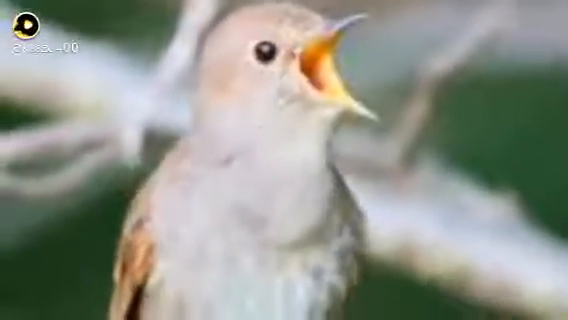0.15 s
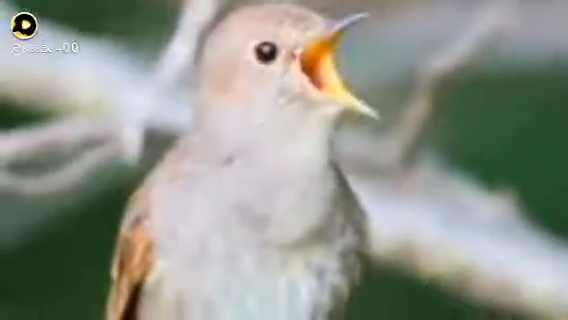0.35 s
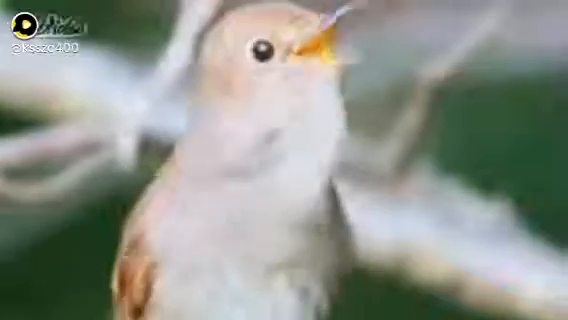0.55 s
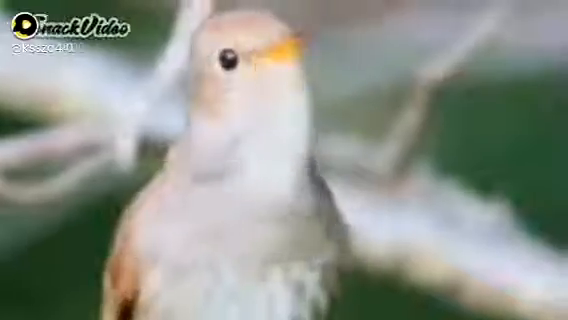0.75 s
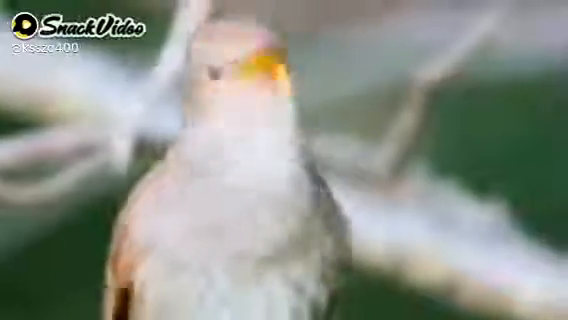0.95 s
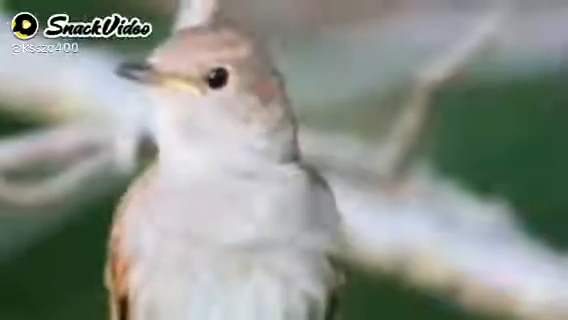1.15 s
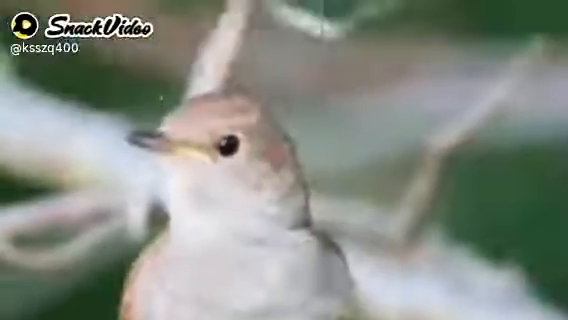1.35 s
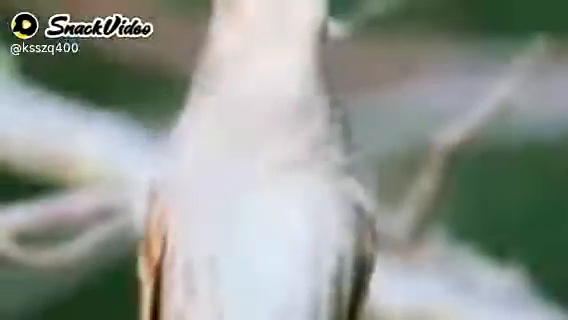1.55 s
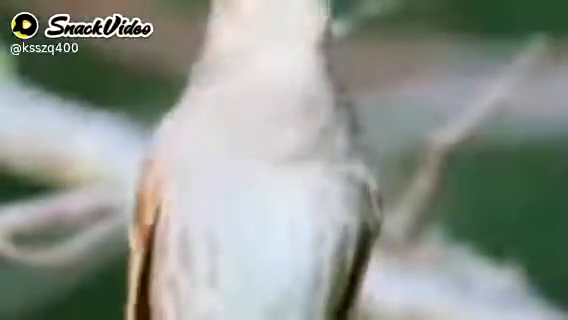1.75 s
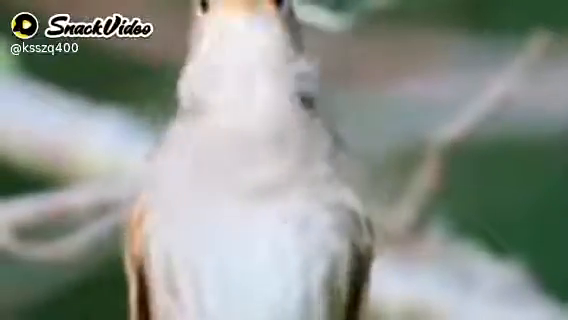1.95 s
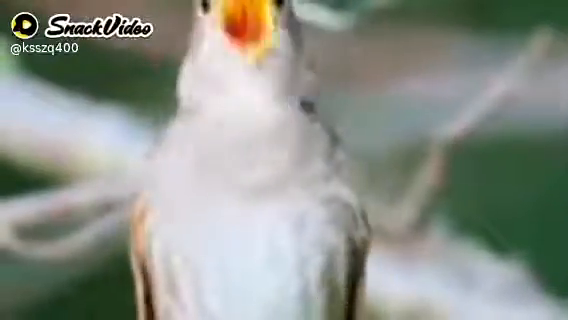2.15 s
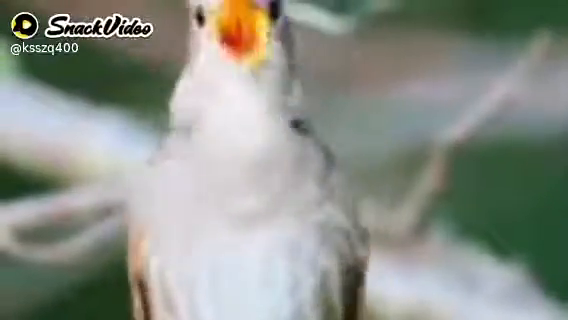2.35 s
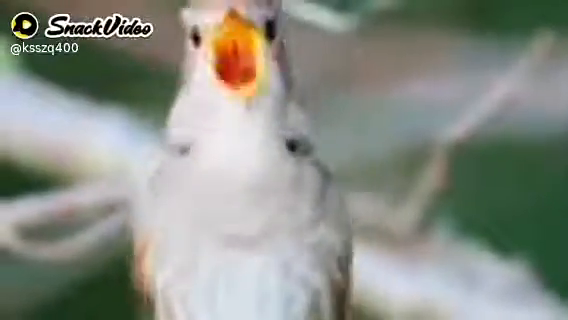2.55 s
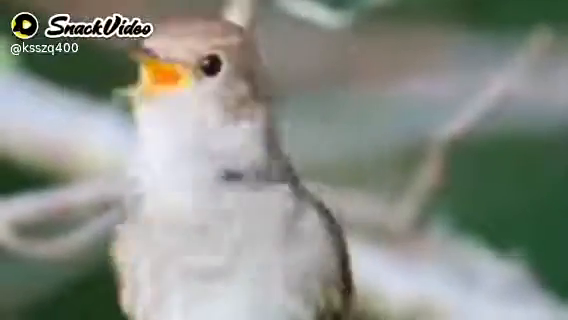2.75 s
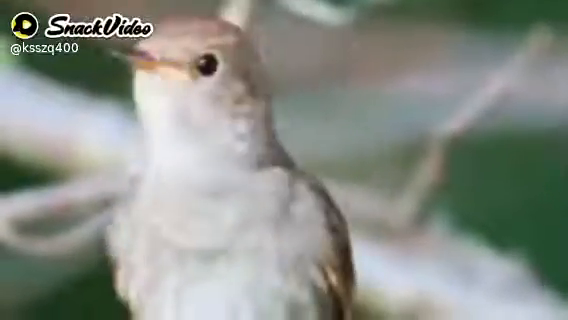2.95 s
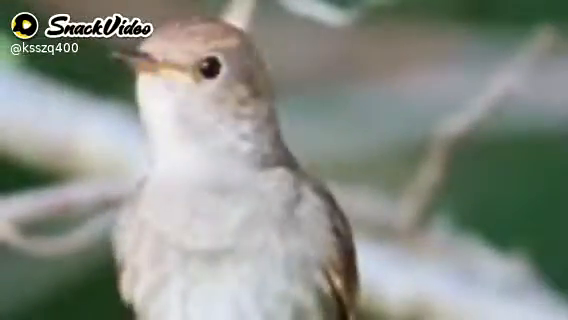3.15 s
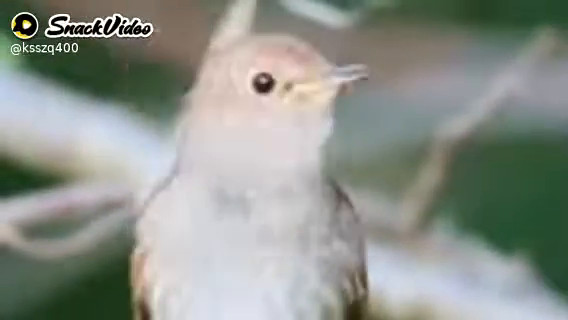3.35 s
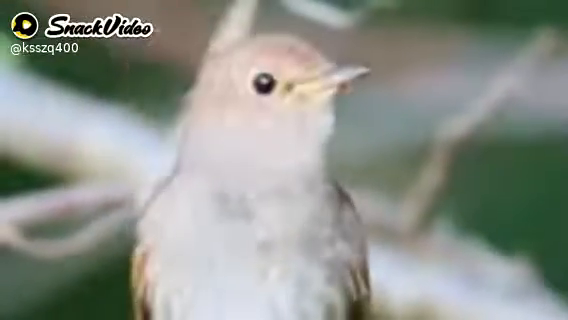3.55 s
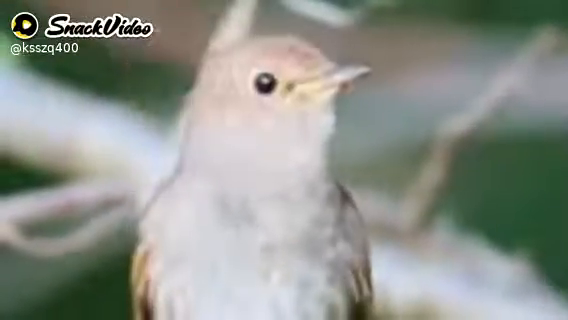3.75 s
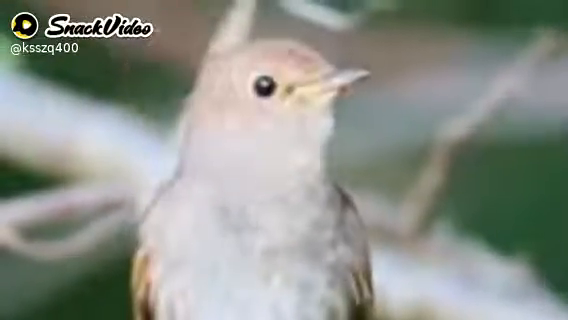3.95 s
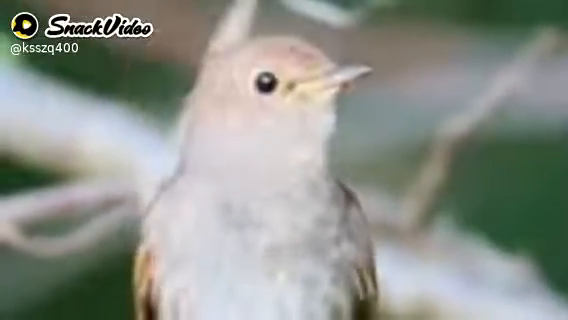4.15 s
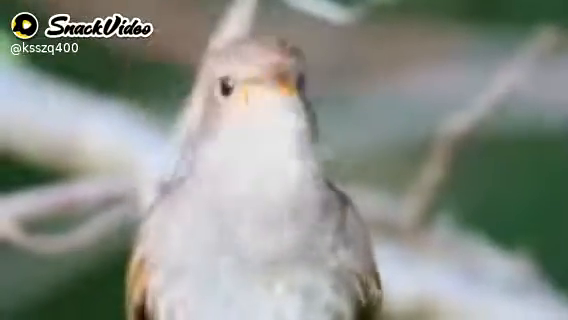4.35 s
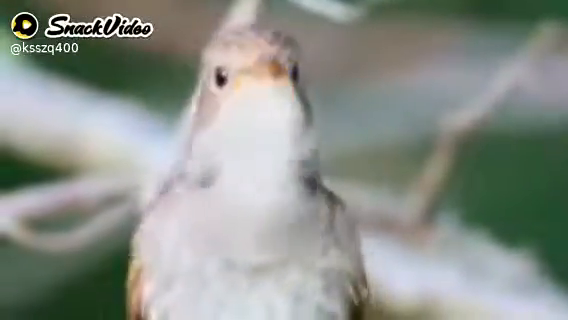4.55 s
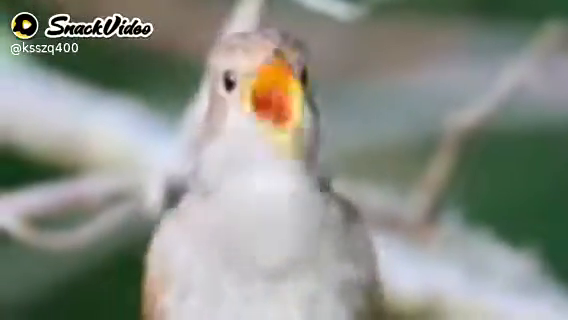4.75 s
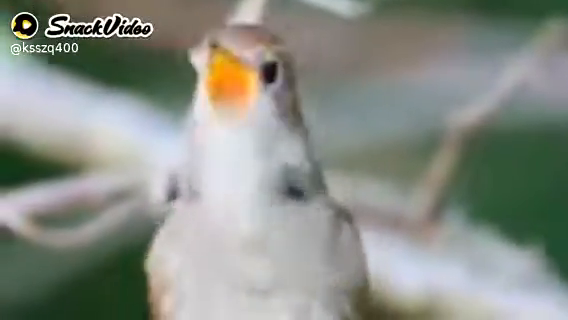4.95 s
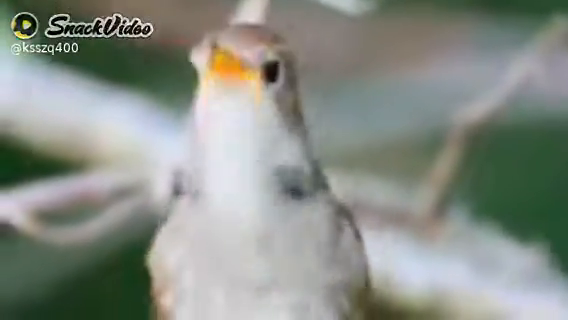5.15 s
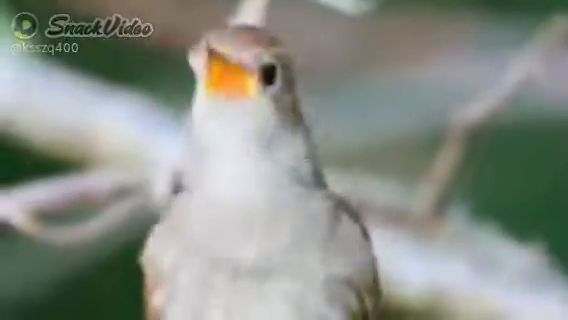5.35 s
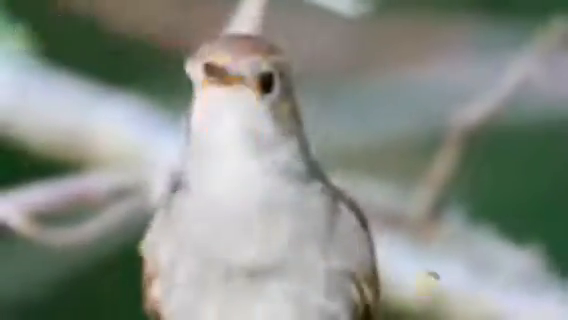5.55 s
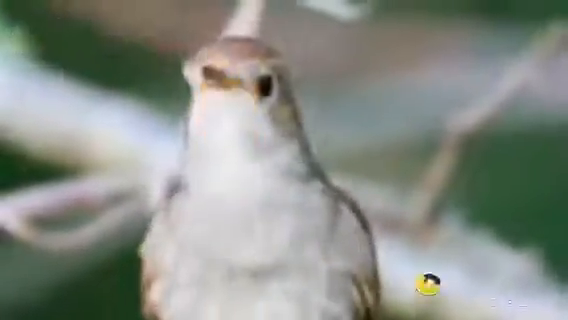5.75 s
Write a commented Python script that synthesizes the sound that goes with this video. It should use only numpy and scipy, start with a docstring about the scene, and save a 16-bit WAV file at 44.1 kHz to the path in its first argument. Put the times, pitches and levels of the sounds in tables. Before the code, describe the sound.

Close birdsong in a wood: dry rattle, quick slurred phrases, ringing pauses, fainter distant whistles and rasps, and a final clicking run ending in a buzz.

```python
"""A nightingale sings close by in a wood: a dry rattle of chaotic bursts, then three runs of fast swept notes.
The runs alternate slurs with low arches, scoops with chips, clicks with low arches; the last two end in a buzz.
Each note is a nearly pure tone with weak overtones and air hiss, shaped by the beak.
A second bird whistles and rasps farther off, mostly in the pauses and on into the third run.
Trunks and leaves scatter every note as decaying noise, over a soft outdoor hush and a faint low throb."""
import sys
import numpy as np
from scipy import signal
from scipy.fft import rfft, irfft, next_fast_len
from scipy.io import wavfile
from scipy.ndimage import map_coordinates

SR = 44100
rng = np.random.default_rng(int(sys.argv[2]) if len(sys.argv) > 2 else 0)


def store_pcm(level_fs):
    """Save levels as 16-bit WAV."""
    pcm = np.round(np.clip(level_fs, -1, 1) * 32767).astype(np.int16)
    wavfile.write(sys.argv[1], SR, np.atleast_2d(pcm).T)


N = 256662


def amp(db):
    """Decibels to gain."""
    return 10 ** (np.asarray(db) / 20)


def unit(x):
    """Scale to rms 1."""
    return x / np.sqrt(np.mean(x ** 2) + 1e-20)


def along(points, hz):
    """Read (f/Hz, value) points on a log frequency axis."""
    f, value = np.transpose(points)
    return np.interp(np.log(hz + 1), np.log(f + 1), value)


def curve(rows):
    """One value per sample from (t/s, value) rows."""
    return np.interp(np.arange(N) / SR, *np.transpose(rows))


def filtered(x, response):
    """Multiply the spectrum by a response of frequency."""
    size = next_fast_len(N + SR // 2)
    spectrum = rfft(x, size)
    return irfft(spectrum * response(np.fft.rfftfreq(size, 1 / SR)), size)[..., :N]


def noise(colour):
    """Coloured noise of rms 1."""
    white = rng.standard_normal(N)
    return unit(filtered(white, lambda hz: amp(along(colour, hz))))


def wobble(rate):
    """A smooth random curve, rate knots a second."""
    knots = rng.standard_normal(N // 8)
    return map_coordinates(knots, [np.arange(N) * rate / SR], mode="wrap")


def span(s, length):
    """The samples of a note and its progress u from 0 to 1."""
    i = np.arange(max(int(s * SR), 0), min(int((s + length) * SR), N))
    return i, np.clip((i / SR - s) / length, 0, 1)


def swell(u, peak, steepness):
    """Air pressure rises to its peak and falls again."""
    pressure = np.interp(u, [0, np.clip(peak, .05, .95), 1], [0, 1, 0])
    return np.sin(np.pi / 2 * pressure) ** steepness


def glide(u, pitches):
    """A smooth sweep through evenly spaced pitches: a polynomial in log pitch."""
    places = np.linspace(0, 1, len(pitches))
    fit = np.polyfit(places, np.log(pitches), len(pitches) - 1)
    return np.exp(np.polyval(fit, u))


# outdoor hush, relative spectrum: f/Hz, level/dB
HUSH_COLOUR = [(15, -33), (25, -16), (50, -5.5), (85, -7.5), (150, -8), (250, -5), (500, -1.5), (800, -4),
               (1280, -0.5), (1750, 3), (3000, -3), (5200, -14), (9500, -18.5), (14500, -37)]
# its rise and fall, before the lift in hush(): t/s, level/dB
HUSH_FADER = [(0.0, -54.5), (0.99, -58.5), (1.73, -57), (2.54, -59.5), (3.21, -57.5), (5.46, -55.5),
              (5.82, -56.5)]


def hush(lift_db=8.5):
    """Distant air and foliage: coloured noise whose level drifts slightly."""
    level_db = curve(HUSH_FADER) + lift_db + 0.14 * wobble(7.2)
    return amp(level_db) * noise(HUSH_COLOUR)


# strokes of the rattle: t/s, level/dB of the main burst, level/dB of the second burst re the main one
RATTLE_STROKES = [(.0095, -21.5, -6), (0.0491, -18.5, -4.5), (0.0887, -21.5, -11), (0.1214, -17.5, -10.5),
                  (0.167, -20, -21), (0.1933, -24, 5.5), (0.241, -22.5, -5), (0.2716, -23, 2.5),
                  (0.316, -21, -16), (0.352, -20.5, -4), (0.3923, -21.5, 1)]
# lone rasps, some on a note and some between notes: t/s, length/s, level/dB
SINGLE_RASPS = [(.903, 0.0091, -24), (1.718, .011, -45), (1.8315, 0.0075, -33.5), (1.8458, 0.0043, -36.5),
                (2.819, 0.0093, -36.5), (5.294, 0.017, -36), (5.457, 0.0043, -24.5)]
BURST_S, BURST_GAP_S, LEAD_IN_DB = 0.006, 0.0104, -9.5  # lead-in level is re the main burst


def bursts():
    """Each stroke is a weak lead-in, a main burst and a second one; lone rasps follow: (start, length, level)."""
    for s, db, second_db in RATTLE_STROKES:
        yield s - BURST_GAP_S, BURST_S, db + LEAD_IN_DB
        yield s, BURST_S, db
        yield s + BURST_GAP_S, BURST_S, db + second_db
    yield from SINGLE_RASPS


# relative spectrum of the rattle, shared by the tearing in song(): f/Hz, level/dB
RASP_SPECTRUM = [(710, -28), (1200, -25), (1800, -33), (1990, -25), (2570, -23.5), (2830, -8.5), (3260, -4),
                 (4640, 4), (6070, 0.5), (6610, 5.5), (8200, -11.5), (10800, -11), (11900, -8.5),
                 (14000, -22.5), (15600, -35)]


def rattle(likeness=0.037):
    """Short bursts of chaotic vibration; a small share of each repeats the same figure."""
    out, figure, fresh = np.zeros(N), noise(RASP_SPECTRUM), noise(RASP_SPECTRUM)
    for s, length, db in bursts():
        i, u = span(s, length)
        # power shares, so the mix keeps its level
        chaos = np.sqrt(likeness) * figure[:len(i)] + np.sqrt(1 - likeness) * fresh[i]
        out[i] += amp(db) * swell(u, 0.33, steepness=0.7) * chaos
    return out


# a faint low throb far off: t/s of the first beat's middle, period/s, number of beats
THROB_BEATS = (.082, .224, 9)


def throb(beat_hz=92, length=0.0576, db=-60):
    """Dull, evenly spaced beats of a low sine, their levels varying a little at random."""
    out, (first, period, beats) = np.zeros(N), THROB_BEATS
    for s in first + period * np.arange(beats):
        i, u = span(s, length)
        level = amp(db + rng.normal(0, 1.8))
        out[i] += level * np.sin(np.pi * u) ** 2 * np.sin(2 * np.pi * beat_hz * length * u)
    return np.roll(out, -int(length * SR / 2))  # centre each beat on its time


# low notes, each part of one arch, loudest near its crest:
# t/s, length/s, level/dB at the peak, place of the crest 0-1, f/Hz at the crest
LOW_ARCHES = [(0.4327, .021, -27.5, 0.2, 1840), (0.514, 0.032, -19.5, 1, 1980),
              (.6088, 0.039, -17, 0.74, 1950), (0.7118, 0.025, -13, 0.47, 1937),
              (0.806, 0.02, -23, 0.27, 1710), (4.5131, 0.02, -19, 0.12, 2207),
              (4.5648, 0.034, -14, 0.71, 2240), (4.6384, 0.022, -16.5, 0.15, 2180),
              (4.6893, 0.031, -11, 0.57, 2222), (4.755, 0.025, -24.5, 0.21, 1943),
              (4.812, 0.034, -14.5, 0.58, 2240), (4.8657, 0.034, -12.5, 0.67, 2209),
              (4.937, .023, -13.5, .22, 2200), (4.99, .03, -12, .62, 2188), (5.0642, 0.02, -16, 0.11, 2184),
              (5.1128, 0.03, -11, 0.49, 2187), (5.181, 0.021, -17.5, 0.95, 2180),
              (5.2402, .03, -11, 0.56, 2184), (5.291, 0.038, -16.5, 0.74, 2178),
              (5.3636, 0.025, -12.5, 0.29, 2165)]
# the shared arch: t/s from the crest, pitch as a share of the crest's
ARCH_SHAPE = [(-.027, .87), (-.018, .805), (-.01, .87), (-.003, 1), (.002, .99), (.007, .84), (.013, 0.57),
              (.021, 0.28)]


def arches():
    """Low notes that each sing a part of one shared pitch arch."""
    for s, length, db, crest, crest_hz in LOW_ARCHES:
        t = (span(s, length)[1] - crest) * length
        pitch = crest_hz * np.interp(t, *np.transpose(ARCH_SHAPE))
        yield s, length, db, np.clip(crest, .25, .68), pitch


# slurs: t/s, length/s, level/dB at the peak, place of the peak 0-1, place of the steepest fall 0-1, steepness
DOWN_SLURS = [(0.4729, 0.037, -12.5, 0.12, 0.36, 6.2), (.562, 0.04, -10, 0.36, 0.38, 6.7),
              (0.66, 0.034, -10.5, 0.41, 0.2, 8.8), (0.7576, 0.035, -12.5, 0.09, 0.23, 15),
              (0.848, 0.032, -10.5, 0, 0.36, 6.2), (2.1921, 0.035, -14, 0.48, 0.46, 3.6)]
SLUR_HIGH_HZ, SLUR_LOW_HZ = 3708, 2245  # the slide runs between these limits


def slurs():
    """Notes that slide down an S-curve from an upper pitch towards a lower one."""
    for s, length, db, peak, steepest, steepness in DOWN_SLURS:
        u = span(s, length)[1]
        still_high = 1 / (1 + np.exp(steepness * (u - steepest)))
        yield s, length, db, peak, SLUR_LOW_HZ + (SLUR_HIGH_HZ - SLUR_LOW_HZ) * still_high


# high whistles that open or close a run:
# t/s, length/s, level/dB at the peak, place of the peak 0-1, start f/Hz, end f/Hz
RUN_WHISTLES = [(0.9074, 0.037, -12.5, 0.45, 4350, 4690), (2.0645, 0.032, -14.5, 0.6, 6000, 5420),
                (2.087, 0.035, -11, 0.37, 5240, 4830), (2.809, 0.025, -12.5, 0.55, 6150, 4830)]


def whistles():
    """High notes that glide evenly in log pitch."""
    for s, length, db, peak, *pitches in RUN_WHISTLES:
        yield s, length, db, peak, glide(span(s, length)[1], pitches)


# scoops: t/s, length/s, level/dB at the peak, place of the peak 0-1, place of the lowest pitch 0-1
UP_SCOOPS = [(2.2456, 0.041, -13, 0.64, 0.2), (2.339, .045, -10, 0.32, 0.38),
             (2.4328, 0.039, -9.5, 0.45, 0.19), (2.525, 0.04, -10.5, 0.52, 0.2),
             (2.6115, .044, -11, 0.51, 0.43), (2.713, 0.0385, -9, 0.22, .28)]
SCOOP_HZ, SCOOP_TOP_HZ = 3068, 4250  # lowest pitch; ceiling of the curl
SCOOP_CURL_S = 0.042  # sets the curl: uncapped, an octave up this long after the lowest pitch


def scoops():
    """Notes that sag to one pitch and curl up again, faster and faster up to a ceiling."""
    for s, length, db, peak, lowest in UP_SCOOPS:
        t = (span(s, length)[1] - lowest) * length
        curl = SCOOP_HZ * 2 ** ((t / SCOOP_CURL_S) ** 2)
        yield s, length, db, peak, np.minimum(curl, SCOOP_TOP_HZ)


# chips: t/s, length/s, level/dB at the peak, start f/Hz
LOW_CHIPS = [(2.3134, 0.0079, -26, 2110), (2.399, 0.015, -22, 2250), (2.49, 0.015, -32.5, 1626),
             (2.589, .012, -29, 2300), (2.6763, 0.014, -20.5, 2300), (2.766, 0.022, -22, 2400)]
CHIP_BEND_S, CHIP_FALL, CHIP_PEAK = 0.00515, 0.39, 0.23  # bend time, fall exponent, place of the peak 0-1


def chips():
    """Short notes that drop fast, then level off."""
    for s, length, db, start_hz in LOW_CHIPS:
        t = span(s, length)[1] * length
        yield s, length, db, CHIP_PEAK, start_hz / (1 + t / CHIP_BEND_S) ** CHIP_FALL


# clicks: t/s, length/s, level/dB at the peak
SWEPT_CLICKS = [(4.5, .005, -15.5), (4.5646, .007, -16.5), (4.625, 0.0091, -11.5), (4.692, 0.0068, -18),
                (4.7431, 0.005, -10), (4.8122, 0.0066, -13), (4.9297, .0065, -9.5), (5.051, .0058, -9.5),
                (5.166, 0.0066, -18.5), (5.239, 0.01, -18.5), (5.359, .006, -10.5)]
# pitches evenly spaced along every click: f/Hz
CLICK_SWEEP = [7290, 4800, 3880, 2300]


def clicks():
    """Each click is one very fast downward sweep."""
    for s, length, db in SWEPT_CLICKS:
        yield s, length, db, 0.29, glide(span(s, length)[1], CLICK_SWEEP)


def syllables():
    """Every swept note of the near bird: (start, length, level, place of the peak, pitch per sample)."""
    for kind in (arches, slurs, whistles, scoops, chips, clicks):
        yield from kind()


def syrinx(pitch, level, slope_db, even_db):
    """A sine and, apart from it, overtones falling by slope_db an octave; even_db offsets the even ones."""
    phase = 2 * np.pi * np.cumsum(pitch) / SR
    overtones = 0
    for k in range(2, 7):
        gain = amp(slope_db * np.log2(k) + even_db * (k % 2 == 0))
        below_nyquist = k * pitch < SR / 2
        overtones = overtones + gain * np.sin(k * phase) * below_nyquist
    return level * np.array([np.sin(phase), overtones])


# how throat and open beak pass overtones and hiss: f/Hz, level/dB
BEAK_COLOUR = [(2500, -14), (4500, -7), (6500, -13), (8300, -23.5), (9400, -5), (10400, -10.5),
               (11300, -12.5), (12600, -6), (13900, -11), (15000, -27)]
# how wide the beak lets the topmost treble out, run by run: t/s, level/dB
BEAK_GAPE = [(.45, -19), (.85, -22), (.92, -12), (1.9, -32), (2.77, -47), (2.83, -11), (3.1, 17.5),
             (4.4, -18), (4.52, -6), (5.45, -13)]


def beak(voice, air_db=-19, direct_db=-5, bounced_db=-3, edge_hz=11500):
    """The tone passes freely; overtones and air-jet hiss are coloured, and beamed at the nearby leaves."""
    tone, overtones = voice
    jet = amp(air_db) * tone * rng.standard_normal(N)
    treble = filtered(overtones + jet, lambda hz: amp(along(BEAK_COLOUR, hz)))
    lower = filtered(treble, lambda hz: 1 / (1 + (hz / edge_hz) ** 40))
    topmost = treble - lower
    treble = lower + amp(curve(BEAK_GAPE)) * topmost
    bounced = scatter(treble, early_db=bounced_db, late_db=-7.5, early_t60=0.0068, gap=.001)
    return tone + amp(direct_db) * treble + bounced


def song(tear_db=-19, tear_speed=60, even_db=-11, skew_db=8):
    """Each note is one quick sweep under one push of air; the fastest sweeps turn lopsided and tear into a rasp."""
    voice, tear, waver = np.zeros((2, N)), np.zeros(N), 1 + 0.0091 * wobble(700)
    for s, length, db, peak, pitch in syllables():
        speed = abs(np.log(pitch[0] / pitch[-1])) / length
        strain = speed ** 4 / (speed ** 4 + tear_speed ** 4)
        i, u = span(s, length)
        level = amp(db) * swell(u, peak, steepness=1.58)
        # a lopsided swing strengthens the even overtones
        voice[:, i] += syrinx(pitch * waver[i], level, slope_db=-13.0, even_db=even_db + skew_db * strain)
        # the rasp starts just ahead of the tone
        i, u = span(s - .003, length + 0.002)
        tear[i] += amp(db + tear_db) * swell(u, 1.0, steepness=0.79) * strain
    return beak(voice) + tear * noise(RASP_SPECTRUM)


# the far bird's clear whistles; the row at 5.408 is a weak lower voice under the near bird's last buzz
# (before the fader in scene()): t/s, length/s, level/dB, start f/Hz, end f/Hz
CLEAR_WHISTLES = [(1.576, 0.02, -45, 6020, 4360), (1.781, 0.023, -40, 5370, 4420),
                  (3.033, 0.056, -45, 4400, 3920), (3.342, 0.057, -33, 4340, 4025),
                  (3.416, 0.02, -33.5, 2760, 3390), (3.654, 0.031, -35.5, 4950, 6830),
                  (3.944, 0.045, -27, 4290, 3620), (3.971, 0.047, -24, 3350, 2922),
                  (4.059, 0.034, -28.5, 4310, 3640), (4.094, 0.016, -22.5, 4070, 3295),
                  (4.233, 0.029, -27, 2170, 2765), (4.313, 0.036, -24.5, 2300, 2730),
                  (4.39, 0.026, -23, 3290, 2920), (4.398, 0.042, -20.5, 3650, 3482),
                  (4.523, 0.031, -22.5, 5400, 3910), (4.595, 0.066, -26, 3710, 3035),
                  (4.684, 0.03, -27.5, 4220, 3470), (4.766, .045, -22, 3140, 2776),
                  (4.887, 0.037, -24.5, 2850, 3446), (4.927, 0.025, -29.5, 3070, 2670),
                  (5.408, 0.034, -34.5, 4800, 4680), (5.598, 0.032, -42.5, 6000, 3590),
                  (5.768, 0.0088, -30, 4250, 4030)]
# the far bird's hoarse calls, likewise: t/s, length/s, level/dB, f/Hz, hoarseness (about 0-1)
HOARSE_CALLS = [(1.948, 0.06, -39, 2483, 1.2), (3.042, 0.023, -38, 5940, 1),
                (3.127, 0.025, -40, 2975, 0.42), (3.134, 0.091, -38.5, 5070, .5),
                (3.171, 0.059, -36, 5580, 1.01), (3.434, 0.03, -28, 4197, 0.37),
                (3.491, .041, -28, 3750, 0.29), (3.564, .057, -30.5, 7460, 0.62),
                (3.635, 0.017, -31.5, 4800, 0.5), (3.772, 0.026, -39.5, 4430, 0.64),
                (3.81, 0.053, -34, 5690, 0.38), (4.159, 0.044, -25.5, 4664, 0.42)]
FAR_EASE, FAR_HOARSE = 1.73, 0.084  # whistles settle towards their end pitch and shake only slightly


def far_calls():
    """Clear whistles, then hoarse calls, as (samples, progress, level, pitch, hoarseness)."""
    for s, length, db, start_hz, end_hz in CLEAR_WHISTLES:
        i, u = span(s, length)
        yield i, u, db, end_hz + (start_hz - end_hz) * (1 - u) ** FAR_EASE, FAR_HOARSE
    for s, length, db, hz, hoarse in HOARSE_CALLS:
        yield *span(s, length), db, hz, hoarse


def far_bird():
    """Softer whistles and hoarse calls; the hoarser the note, the more its pitch shakes at random."""
    voice, shake = np.zeros((2, N)), wobble(2200)
    for i, u, db, hz, hoarse in far_calls():
        pitch = hz * (1 + 0.195 * hoarse * shake[i])
        level = amp(db) * swell(u, 0.72, steepness=0.49)
        voice[:, i] += syrinx(pitch, level, slope_db=-23, even_db=6)
    return beak(voice)


# buzzed notes: t/s, length/s, start f/Hz, end f/Hz (before the pulse swing), level/dB (before the chopping)
BUZZED_NOTES = [(2.816, 0.023, 7220, 6330, -21.5), (5.413, 0.0396, 6630, 5860, -9.5),
                (5.456, 0.0267, 7000, 6020, -18.5)]


def buzz(flutter_hz=176, depth=0.86, swing=0.057):
    """A fast flutter chops a high tone into pulses that each fall in pitch."""
    voice = np.zeros((2, N))
    for s, length, start_hz, end_hz, db in BUZZED_NOTES:
        i, u = span(s, length)
        cycle = 2 * np.pi * flutter_hz * u * length
        pulses = 1 - depth * (1 + np.sin(cycle)) / 2
        pitch = glide(u, [start_hz, end_hz]) * (1 - swing * np.cos(cycle))
        level = amp(db) * pulses * swell(u, 0.47, steepness=1.0)
        voice[:, i] += syrinx(pitch, level, slope_db=-11, even_db=1.0)
    return beak(voice)


# how long the wood rings: f/Hz, t60/s
WOOD_DECAY = [(1000, .36), (2500, .39), (4500, .38), (7000, .42), (10000, .3), (15000, .28)]


def scatter(x, early_db, late_db, early_t60=0.051, gap=0.0026, stir_rate=25):
    """Nearby twigs answer at once; trunks and stirring leaves leave a longer tail that drifts between two paths."""
    # three noise tails, each frequency band fading at its own t60
    hz, t, bands = signal.stft(rng.standard_normal((3, SR)), SR, nperseg=256)
    late_t60 = along(WOOD_DECAY, hz)
    t60 = np.array([np.full(len(hz), early_t60), late_t60, late_t60])
    tails = signal.istft(bands * amp(-60 * t / t60[:, :, None]), SR, nperseg=256)[1]
    tails = tails * (np.arange(tails.shape[1]) > gap * SR)
    tails = tails / np.linalg.norm(tails, axis=1, keepdims=True)
    early, one, other = signal.fftconvolve(x[None], tails, axes=1)[:, :N]
    drift = 2 * wobble(stir_rate)
    late = np.cos(drift) * one + np.sin(drift) * other
    return amp(early_db) * early + amp(late_db) * late


def echo(x, delay=0.045, db=-23):
    """One trunk throws the song back."""
    return amp(db) * np.pad(x, (int(delay * SR), 0))[:N]


# the bird turns its head, sending more or less of the song into the trees: t/s, send level/dB
HEAD_TURN = [(.5, 0), (.9, 0), (2.1, -2.5), (2.4, 3), (2.8, 2), (4.5, -1.5), (5.4, 1.5)]
# what trunks and leaves throw back of the near bird: f/Hz, level/dB
FOLIAGE_COLOUR = [(1200, -3), (2200, 1), (3050, 0.5), (4000, 3), (5000, 1), (6500, 2.5), (10000, 7)]


def foliage(near):
    """The turning head sets how much song reaches the trees, which colour and scatter it."""
    outward = filtered(near * amp(curve(HEAD_TURN)), lambda hz: amp(along(FOLIAGE_COLOUR, hz)))
    return scatter(outward, early_db=-9.5, late_db=-15.5)


def scene():
    """Both birds sit straight ahead; only the treble of the near bird's scattered sound is slightly wide."""
    near, rasps, far = song() + buzz(), rattle(), far_bird()
    middle = near + echo(near) + foliage(near)
    middle += rasps + scatter(rasps, early_db=-1.5, late_db=-12.0)
    middle += amp(-2.5) * far + scatter(far, early_db=-3, late_db=-4.0)
    side = scatter(rasps + near * amp(curve(BEAK_GAPE) - 5), early_db=-18, late_db=-30)
    side = filtered(side, lambda hz: hz ** 8 / (hz ** 8 + 4500 ** 8))  # treble only
    return middle + hush() + throb() + np.array([side, -side])


TOP_HZ = 15400


def record(dry):
    """Nothing passes above the band limit."""
    return filtered(dry, lambda hz: hz < TOP_HZ)


dry = scene()
out = record(dry)
store_pcm(out)
```